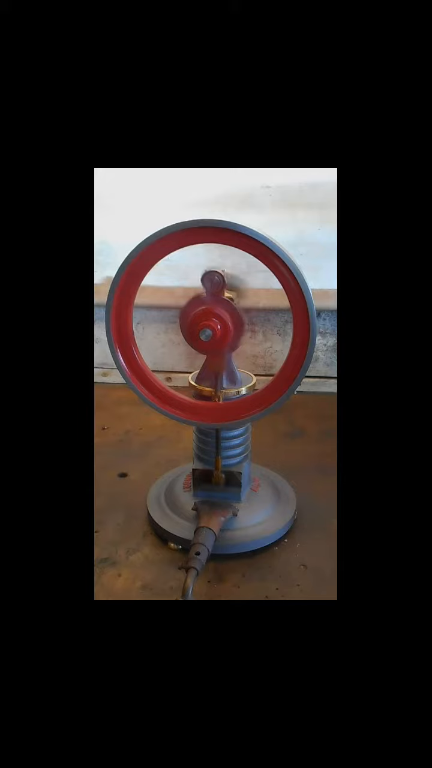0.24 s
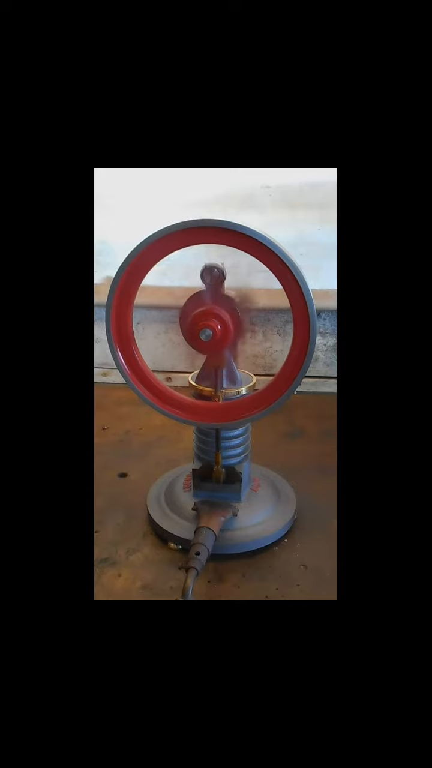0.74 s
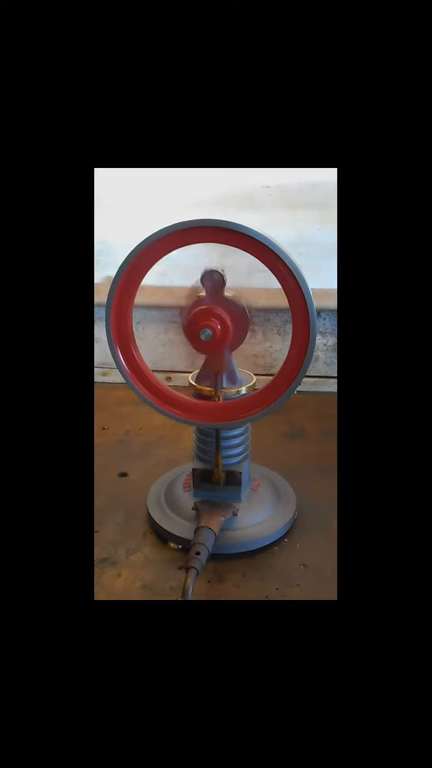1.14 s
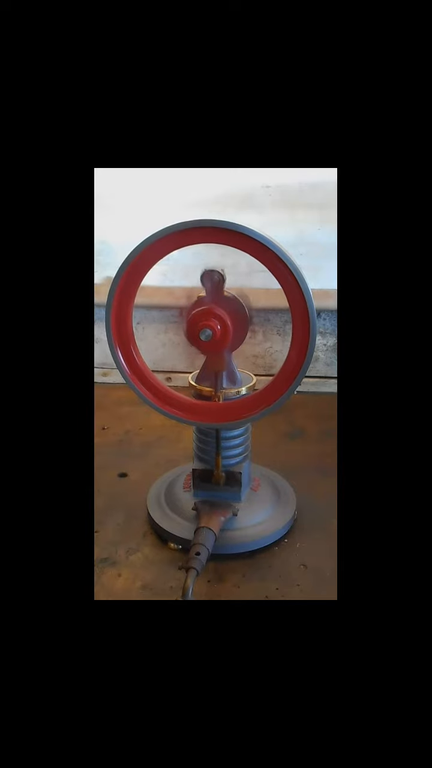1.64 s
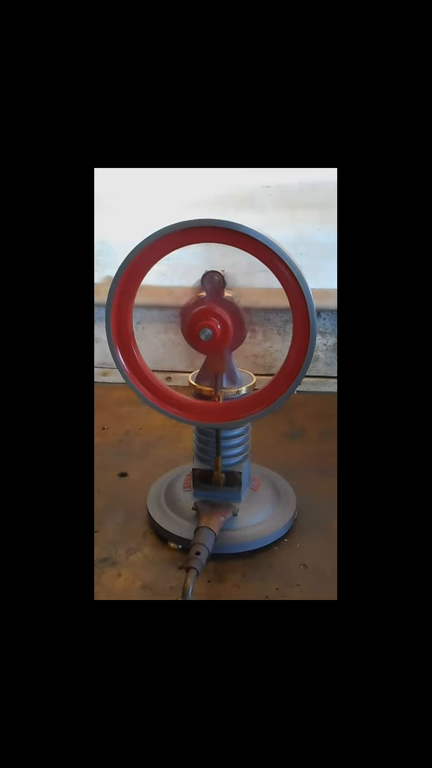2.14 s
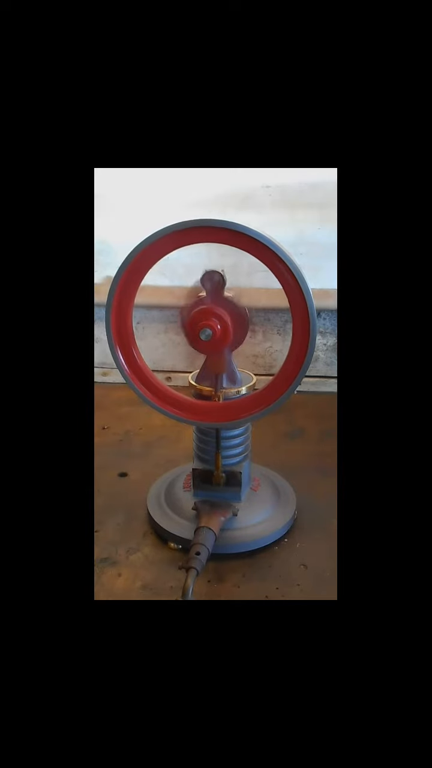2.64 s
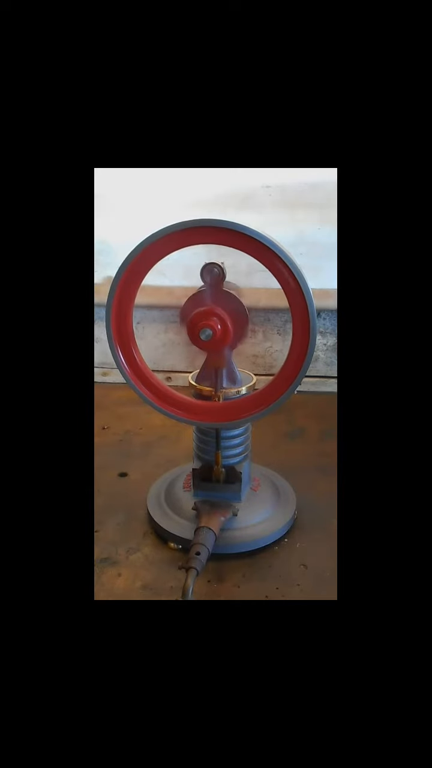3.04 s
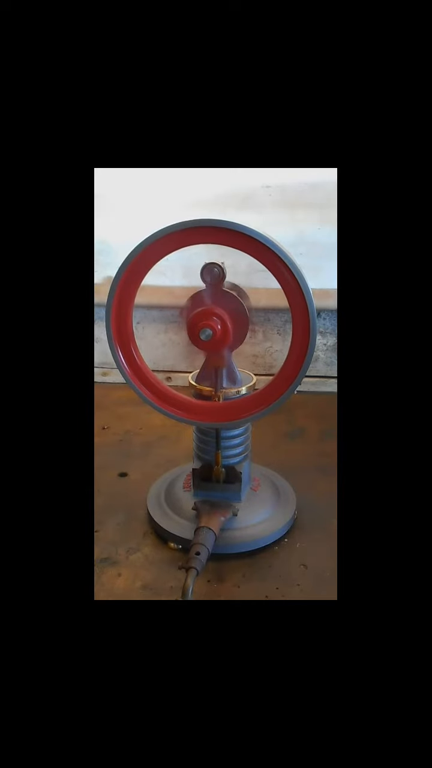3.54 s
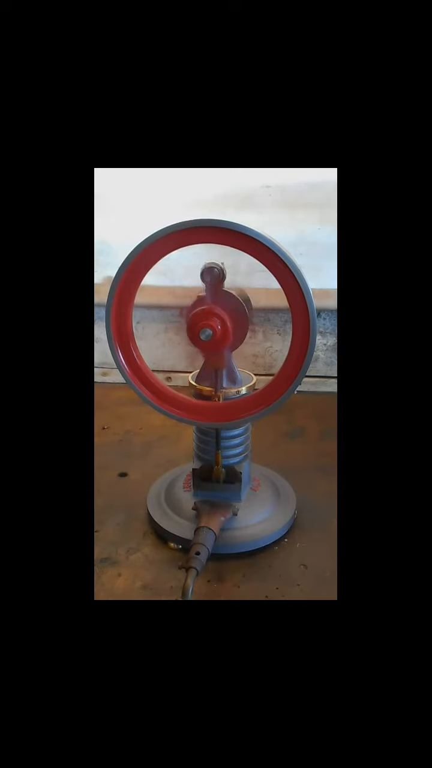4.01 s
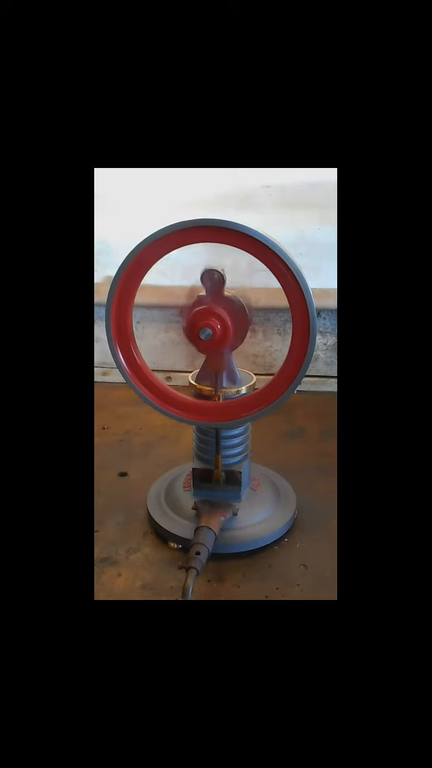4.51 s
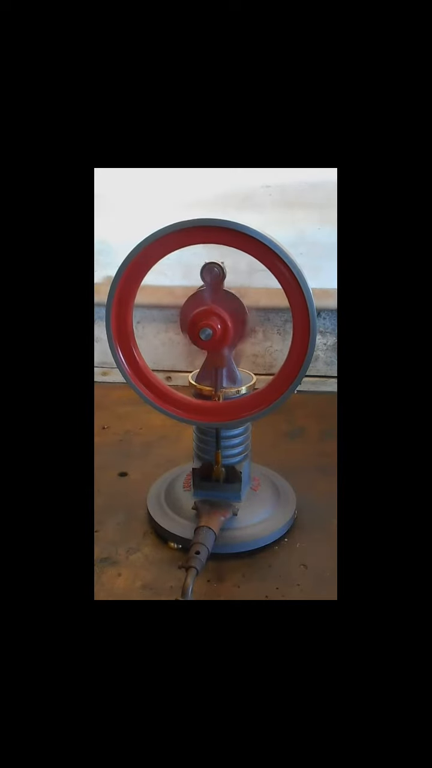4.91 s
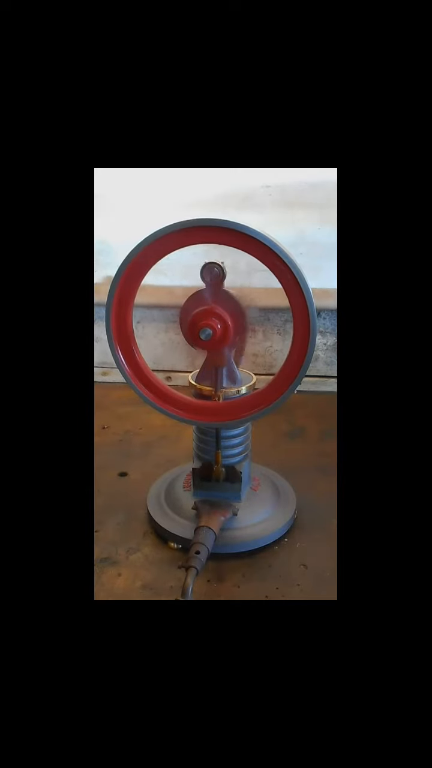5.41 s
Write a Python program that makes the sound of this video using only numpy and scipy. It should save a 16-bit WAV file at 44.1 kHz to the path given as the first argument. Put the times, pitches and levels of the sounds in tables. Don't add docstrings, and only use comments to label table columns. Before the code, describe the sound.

Rapid even mechanical clacking from a little bench engine, with dry rubbing, metallic ringing and a steady faint hiss, heard close up.

```python
import sys
import numpy as np
from scipy import signal
from scipy.fft import rfft, irfft
from scipy.io import wavfile
from scipy.ndimage import uniform_filter1d, minimum_filter1d

SR = 44100
rng = np.random.default_rng(int(sys.argv[2]) if len(sys.argv) > 2 else 0)


def bounce(signal):
    frames = np.transpose(np.atleast_2d(signal))
    limited = np.clip(frames, -1, 1)
    pcm = np.round(limited * 32767).astype(np.int16)
    wavfile.write(sys.argv[1], SR, pcm)


def gain_from_db(level_db):
    decades = np.asarray(level_db, float) / 20
    return 10 ** decades


N = 249606
MS = np.arange(6144) / SR * 1000


def shuttings():
    # time_s, turns
    crank = [(0.0815, 0), (0.586, 3), (0.7558, 4), (1.0909, 6), (1.4335, 8), (1.7711, 10), (2.114, 12),
             (2.7861, 16), (3.1195, 18), (3.2837, 19), (3.9473, 23), (4.4496, 26), (4.6134, 27),
             (5.1148, 30), (5.6147, 33)]
    time_s, turns = np.transpose(crank)
    return np.interp(np.arange(34), turns, time_s)


def overrule(usual, rows):
    usual = np.array(usual)
    for row in rows:
        usual[np.abs(usual[:, 0] - row[0]).argmin()] = row
    return usual


def strokes():
    # lift_s, slap_db, slap_hz, slap_ms
    odd_strokes = [(0.1371, -7, 2820, 17), (0.2987, -5, 2936, 14.6), (0.47, -5, 2930.0, 10.6),
                   (0.6324, -1.5, 2862, 16.4), (0.8018, -3, 2930, 6), (0.9738, -5.5, 2840, 14.4),
                   (1.1481, -9.5, 2850.0, 10.7), (1.317, -5, 2900, 9), (1.4869, -0.5, 2840.0, 8.6),
                   (1.6539, -4.5, 2840.0, 13), (1.827, -1, 2864, 11), (2.0007, -9.5, 2820, 15),
                   (2.1703, -9.5, 2830, 16), (2.339, -3, 2840.0, 12), (2.5064, -0.5, 2880, 5.8),
                   (2.8387, -3.5, 2850, 10), (3.0063, -6, 2840.0, 1.7), (3.1747, -6.5, 2840.0, 9.6),
                   (3.3405, -2.5, 2850.0, 10.2), (3.5044, -7.5, 2933, 12.6), (3.665, -2.9, 2830, 7.9),
                   (3.8275, -1.5, 2915, 20), (4.001, -3.5, 2940, 16.4), (4.1668, -1.5, 2890, 3.6),
                   (4.3334, -2.5, 2940, 5.5), (4.4999, -3.5, 2915, 16), (4.6637, -1, 2925, 9.8),
                   (5.1629, -4.5, 2930.0, 13.4), (5.3323, -4.5, 2913, 14), (5.4989, -4, 2910, 13.3)]
    lift_delay_s = .052
    usual_slap = (-4.5, 2890, 13.5)
    return overrule([(s + lift_delay_s, *usual_slap) for s in shuttings()[:-1]], odd_strokes)


def loose(starts, delay_s, spread_s, level_db, spread_db):
    luck = rng.standard_normal((len(starts), 3))
    start_s = starts + delay_s + spread_s * luck[:, 0]
    return np.c_[start_s, level_db + spread_db * luck[:, 1], luck[:, 2]]


def grains(size, per_s, spread_db):
    strength = gain_from_db(spread_db * np.minimum(rng.exponential(1, size), 4))
    strength = strength * rng.choice([-1, 1], size)
    return strength * (rng.random(size) < per_s / SR) + 1e-18


def resonate(force, peaks):
    out = 0
    for k, (hz, width_hz, db) in enumerate(peaks):
        r = np.exp(-np.pi * width_hz / SR)
        poles = [1, -2 * r * np.cos(2 * np.pi * hz / SR), r * r]
        zeros = [(1 - r * r) / 2, 0, (r * r - 1) / 2]
        out = out + (-1) ** k * gain_from_db(db) * signal.lfilter(zeros, poles, force)
    return out / out.std()


def ring(force, hz, t60_s):
    r, w = gain_from_db(-60 / (t60_s * SR)), 2 * np.pi * hz / SR
    return signal.lfilter([0, np.sin(w)], [1, -2 * r * np.cos(w), r * r], force)


def swell(rise_ms, hold_ms, fall_ms):
    return np.minimum(MS / rise_ms, 1) * np.exp(-np.maximum(MS - hold_ms, 0) / fall_ms)


def glide(start_hz, end_hz, glide_ms, wobble):
    shake = uniform_filter1d(rng.standard_normal(len(MS)), size=64) * 8
    hz = end_hz + (start_hz - end_hz) * np.exp(-MS / glide_ms)
    hz = hz * (1 + wobble * shake)
    return np.sin(2 * np.pi * np.cumsum(hz) / SR)


def crack():
    noise = rng.standard_normal(len(MS)) * swell(.1, .5, fall_ms=3) / 3
    return gain_from_db(-7.5) * signal.lfilter(*signal.butter(1, 1500, "high", fs=SR), noise)


def strike(out, start_s, level_db, modes, hold_ms, fall_ms, per_s=6000, first=2.5, rise_ms=.1, tone=0,
           scatter_db=1.5):
    force = grains(size=len(MS), per_s=per_s, spread_db=2.5) * swell(rise_ms, hold_ms, fall_ms)
    force[0] += first
    luck_db = scatter_db * rng.standard_normal(len(modes))
    sound = sum(gain_from_db(db + d) * ring(force, hz, t60_s) for (hz, db, t60_s), d in zip(modes, luck_db))
    sound = sound / np.abs(sound).max() + tone
    at = round(start_s * SR)
    out[at:at + len(MS)] += gain_from_db(level_db) * sound[:N - at]


def room_hiss():
    # freq_hz, density_db
    spectrum = [(88, -55), (150, -24.5), (887, -6.5), (1430, -9.5), (2920, -16), (7620, -28.5),
                (10500, -40), (13600, -74), (22000, -120)]
    freq_hz, density_db = np.transpose(spectrum)
    hz = np.maximum(np.fft.rfftfreq(N, 1 / SR), 20)
    gain = gain_from_db(np.interp(np.log(hz), np.log(freq_hz), density_db))
    hiss = irfft(rfft(rng.standard_normal(N)) * gain, N)
    return gain_from_db(-39) * hiss / hiss.std()


def sliding():
    # freq_hz, width_hz, level_db
    base = [(539, 25, -20), (883.4, 26.3, 4), (950, 102, -5), (1280, 78, -15.5), (1535, 26, -14.5),
            (1768, 110, -8), (2010, 142, -8), (2225, 100, -5)]
    frame = [(2850, 100, -5), (3530, 84, -1.5), (3977, 157, 0.5), (4795, 92, 4), (9300, 350, -23)]
    fins = [(5050, 160, -1.5), (5350, 165, 3), (5750, 250, -4), (6420, 690, -13), (7090, 250, -10),
            (7950, 810, -21.5)]
    # turn_share, pressure_db
    slide = [
        (0, 11.5),
        (0.12, 3),
        (0.25, 0.5),
        (.43, -3),
        (.48, 2.5),
        (0.62, 0.5),
        (0.72, 1.5),
        (0.82, -0.5),
        (0.999, 2.5),
    ]
    # time_s, dryness_db
    rub = [
        (0.0, -1),
        (0.52, -7),
        (0.94, 0),
        (1.42, -3.5),
        (1.75, 4),
        (2.54, 1.5),
        (3.2, 3),
        (3.62, -6.5),
        (4.16, 0),
        (5.66, 0.5),
    ]
    # level_db, pressure_share, coasting_share, dryness_share
    answer = [
        (-26.5, 0.75, 1.0, .01),
        (-35.5, 1.17, .01, 0.14),
        (-37, 0.85, .01, 1.0),
    ]
    t = np.arange(N) / SR
    lift_s = strokes()[:, 0]
    lift_s = np.r_[2 * lift_s[0] - lift_s[1], lift_s, 2 * lift_s[-1] - lift_s[-2]]
    turn = np.interp(t, lift_s, np.arange(len(lift_s))) % 1
    pressure_db = np.interp(turn, *np.transpose(slide))
    dryness_db = np.interp(t, *np.transpose(rub))
    coasting_db = -8.5 * np.exp(-((turn - 0.898) / 0.068) ** 2)
    out = 0
    for peaks, (level_db, pressed, relieved, dried) in zip((base, frame, fins), answer):
        push = gain_from_db(pressed * pressure_db + relieved * coasting_db)
        grit = grains(size=N, per_s=9000, spread_db=3.5)
        out = out + gain_from_db(level_db + dried * dryness_db) * resonate(push * grit, peaks)
    return out


def rod_rebound():
    # delay_s, spread_s, level_db, spread_db
    timing = (.0848, .0015, -30.5, 1.5)
    # freq_hz, level_db, t60_s
    modes = [(516, -26, 0.067), (1000, 6.5, 0.036), (2270, 4, 0.028), (2940, -5, 0.075), (3770, -8, 0.042),
             (4644, 0, 0.03), (6410, -11.5, 0.016), (9000, -15, 0.011)]
    out, shut_s = np.zeros(N), shuttings()
    turn_s = np.r_[2 * shut_s[0] - shut_s[1], shut_s[:-1]]
    for s, db, _ in loose(turn_s, *timing):
        strike(out, max(s - .001, 0), db + 16, modes, 4, 4, tone=gain_from_db(-4.0) * crack())
    return out


def valve_tick():
    # delay_s, spread_s, level_db, spread_db
    timing = (0, .0003, -18.5, 1.0)
    # freq_hz, level_db, t60_s
    tick_modes = [(1310, -23, 0.0081), (2244, 3.5, 0.018), (3170, -14, .01), (3626, 0, 0.015),
                  (4220, -5.5, 0.023), (4860, 1, 0.012), (5320, -1, 0.0069), (6500, -6.5, 0.0087),
                  (7820, -11.5, 0.017), (8980, -11.5, 0.0052), (9700, -27.5, .005)]
    clunk_modes = [(328, -13.5, 0.086), (550, -12.5, 0.26), (866, 6, 0.062), (1281, 0.5, 0.078),
                   (1675, 3, 0.03), (2185, -6.5, 0.013)]
    out = np.zeros(N)
    for s, db, luck in loose(shuttings(), *timing):
        strike(out, s, db + 5.0, tick_modes, 1.5, 4, per_s=9700, first=3.2, tone=gain_from_db(1.5) * crack(),
               scatter_db=.8)
        clunk_db = -16.5 + 0.5 * luck
        strike(out, s + 0.00195, clunk_db - 1.5, clunk_modes, 10, 5, per_s=2000)
    return out


def valve_thud():
    # freq_hz, level_db, t60_s
    modes = [(415, -1, 0.083), (536.8, 8, 0.084), (610, 0.5, 0.06), (690, -3.5, 0.06), (2270, -6.5, 0.017)]
    out = np.zeros(N)
    for s in strokes()[:, 0]:
        pop = gain_from_db(1.0) * glide(240, 892, 6.5, .015) * swell(2.37, 3.7, 0.74)
        strike(out, s - .002, -14, modes, 4, 1.5, per_s=2800, first=0.17, rise_ms=1.57, tone=pop,
               scatter_db=.7)
    return out


def rattle():
    # freq_hz, level_db, t60_s
    modes = [(946, 4.5, 0.038), (1150, 7.5, 0.023), (1405, 1.5, 0.026), (1690, -13.5, 0.023),
             (2000, -12.5, 0.032), (3347, -2.5, 0.024), (3707, 0, 0.025), (3976, 10, 0.01),
             (4520, 0.5, 0.024), (4600, -19, .02), (5223, 0.5, 0.018), (5640, 1, 0.022), (6160, 0.5, 0.016),
             (7140, -14.5, 0.0086), (7720, -12, 0.02), (8400, -15.5, .008), (9900, -14, 0.011)]
    out = np.zeros(N)
    for s in strokes()[:, 0]:
        strike(out, s + 0.0021, -6.5, modes, 11, 9, per_s=8300, rise_ms=2.2)
    return out


def piston_slap():
    # freq_hz, level_db, t60_s
    cylinder = [(2543, -5.5, 0.06), (2640, 0.5, 0.045), (2840, -4, 0.045), (2930, 4, 0.045),
                (3098, -1, 0.044), (3350, -3, 0.025)]
    out = np.zeros(N)
    for s, slap_db, slap_hz, slap_ms in strokes():
        squeal = glide(1.03 * slap_hz, .98 * slap_hz, 3.96, 0.035)
        squeal = gain_from_db(4.0) * squeal * swell(0.89, slap_ms - 1.5, 2.8)
        strike(out, s + 0.0051, slap_db - 5, cylinder, slap_ms, 4, tone=squeal)
    return out


def pin_ping():
    # delay_s, spread_s, level_db, spread_db
    timing = (.0095, .002, -21, 2.5)
    # freq_hz, level_db, t60_s
    modes = [(7564, -4.5, 0.05), (7640, -5.5, 0.03), (7460, -7.5, 0.03)]
    out = np.zeros(N)
    for s, db, _ in loose(strokes()[:, 0], *timing):
        strike(out, s - .0015, db + 5.5, modes, 3.5, 3.0, first=.3, rise_ms=0.71)
    return out


def rod_knock():
    # delay_s, spread_s, level_db, spread_db
    timing = (.016, .002, -16, 1.5)
    # start_s, level_db, pitch_hz
    odd_knocks = [(0.1483, -8.5, 980), (0.322, -11, 1077), (0.4874, -8, 1000), (0.6516, -9, 950),
                  (0.8263, -25, 1000), (1.1654, -9, 1050), (0.9919, -11.5, 1180), (1.6718, -6.5, 1064),
                  (1.8436, -6, 1104), (2.0144, -5, 1025), (2.1868, -13, 1177), (2.3532, -4, 1103),
                  (2.5201, -8.5, 1094), (3.1884, -2.5, 1000.0), (2.6839, -13.5, 1090),
                  (3.0193, -12.5, 1076), (3.3562, -19, 1250), (3.5221, -12.5, 1020), (3.6865, -9.5, 960),
                  (3.8436, -2.5, 1010), (4.0186, -6.5, 1036), (4.1812, -18, 1150.0), (4.3517, -11, 1060),
                  (4.5114, 0, 987), (4.8443, -14, 1075), (5.0107, -3.5, 1105), (5.184, -12.5, 1150.0),
                  (5.3457, -3.5, 1106)]
    out = np.zeros(N)
    usual = [(s, db, 1035 + 58 * luck) for s, db, luck in loose(strokes()[:, 0], *timing)]
    for s, db, hz in overrule(usual, odd_knocks):
        modes = [(hz, 0, .05), (1150, -9, .06), (930, -9, .06), (540, -12, .06)]
        strike(out, s - .001, db + 2.0, modes, 2.5, 1.5)
    return out


def room_echo(x):
    t60_s, level_db = 0.23, -23.5
    t = np.arange(SR // 3) / SR
    tail = rng.standard_normal(len(t)) * gain_from_db(-60 * t / t60_s) * (t > .004)
    tail = signal.lfilter([1], [1, -.4], tail)
    return gain_from_db(level_db) * signal.fftconvolve(x, tail / np.linalg.norm(tail))[:N]


def scene():
    engine = sliding() + rod_rebound() + valve_tick()
    engine = engine + valve_thud() + rattle() + piston_slap() + pin_ping() + rod_knock()
    return (engine + room_echo(engine) + room_hiss())[None]


def limit(x):
    ceiling, release_db_per_s = .765, 701
    over_db = 20 * np.log10(np.maximum(np.abs(x[0]) / ceiling, 1))
    slope_db = release_db_per_s * np.arange(N) / SR
    held_db = np.maximum.accumulate(over_db + slope_db) - slope_db
    cut_db = uniform_filter1d(-minimum_filter1d(-held_db, size=41), size=41)
    return x * gain_from_db(-cut_db)


def roll_off(x):
    return signal.sosfilt(signal.butter(12, 11200, fs=SR, output="sos"), x)


def record(dry):
    x = signal.sosfilt(signal.butter(2, 310, "high", fs=SR, output="sos"), dry)
    x = signal.sosfilt(signal.cheby2(8, 50, 11620, fs=SR, output="sos"), x)
    hum_band = signal.butter(1, [60, 200], "band", fs=SR, output="sos")
    hum = signal.sosfilt(hum_band, rng.standard_normal(N))
    mix = limit(x) + gain_from_db(-69) * hum / hum.std()
    return roll_off(mix)


dry = scene()
out = record(dry)
bounce(out)
```